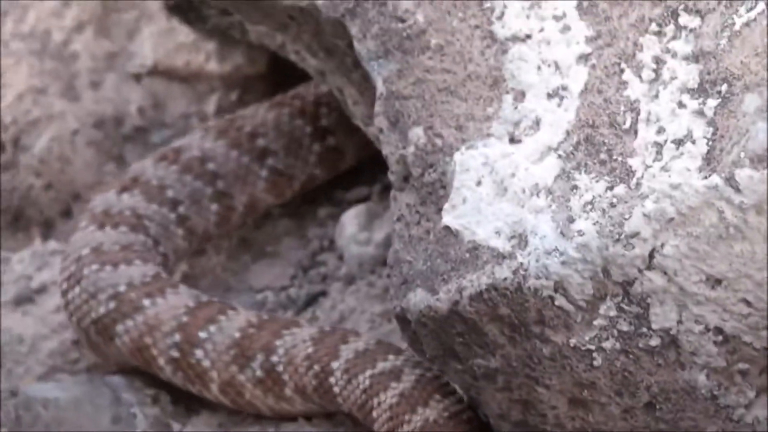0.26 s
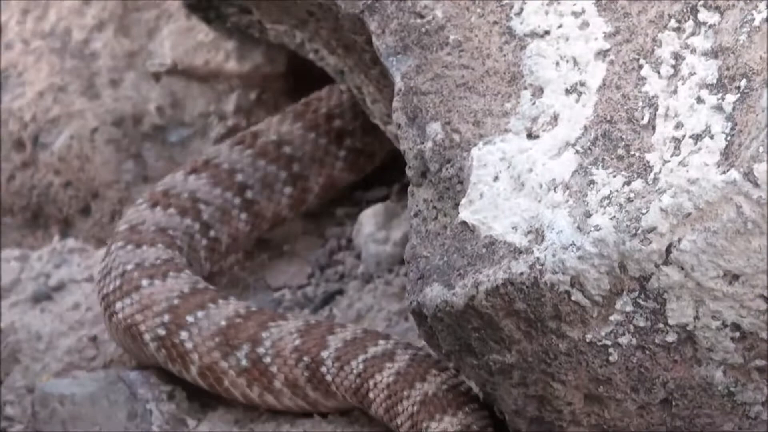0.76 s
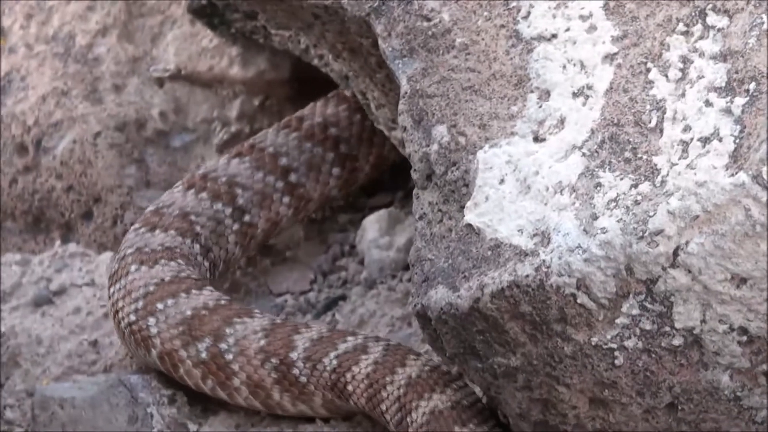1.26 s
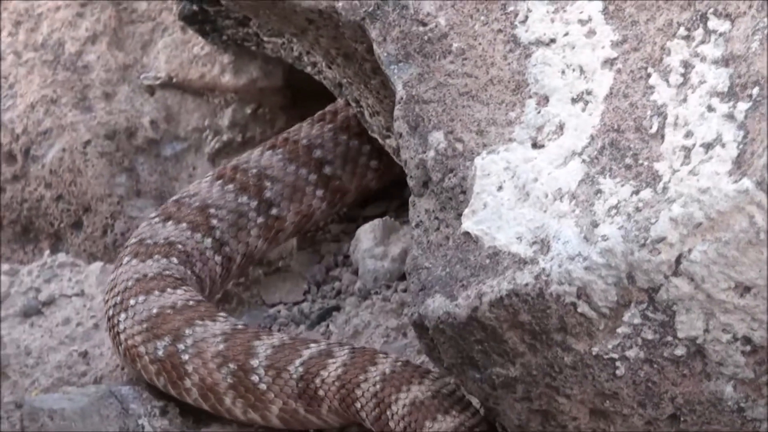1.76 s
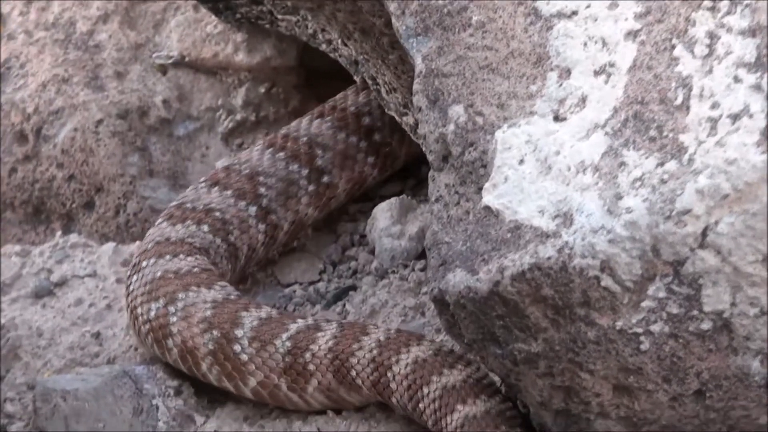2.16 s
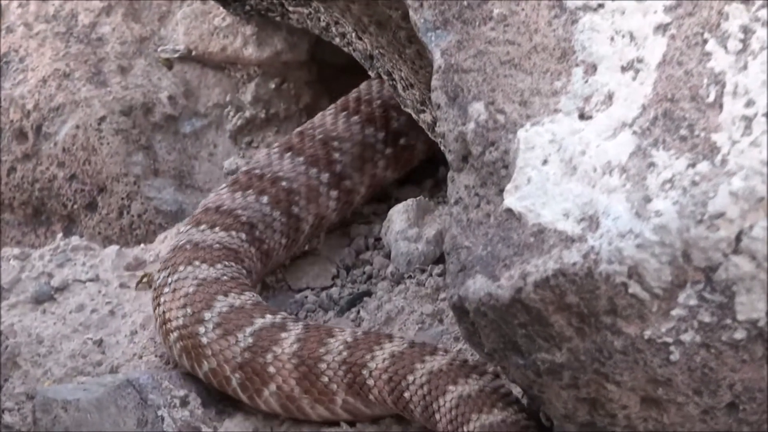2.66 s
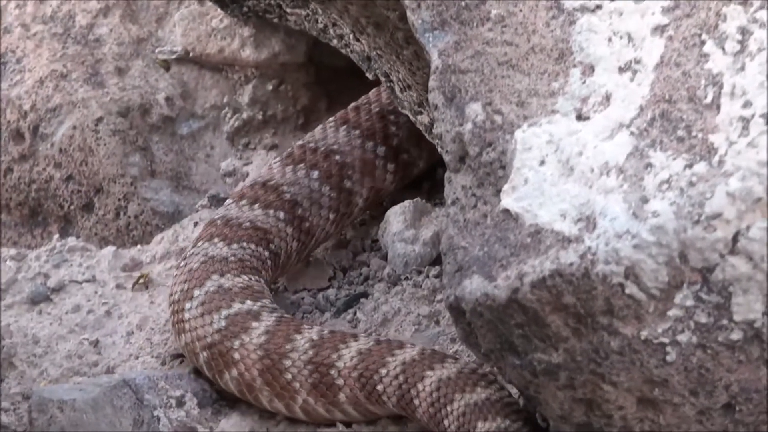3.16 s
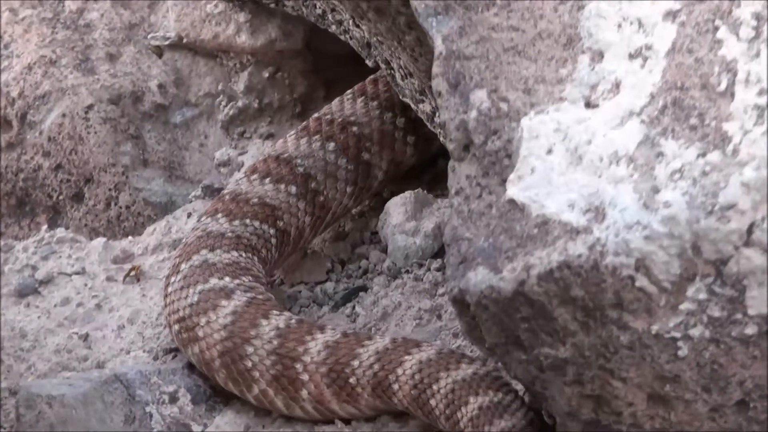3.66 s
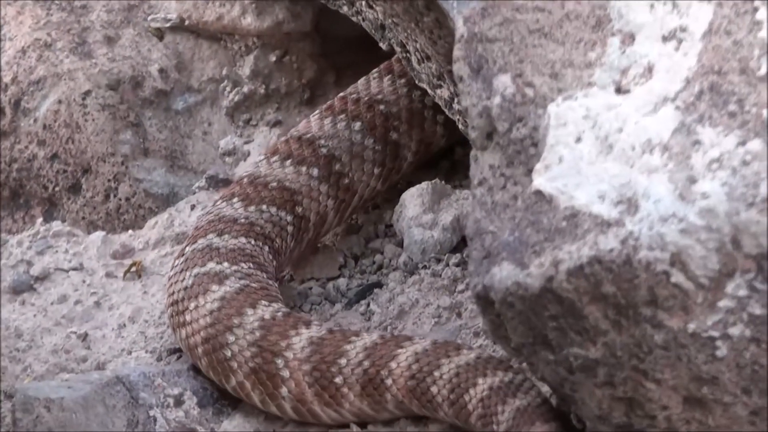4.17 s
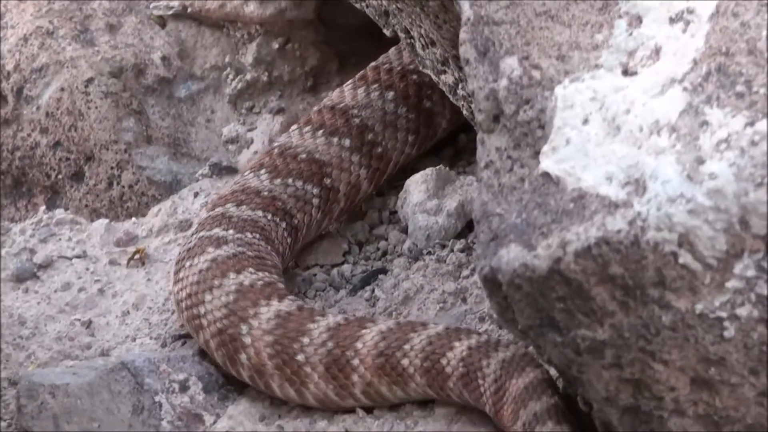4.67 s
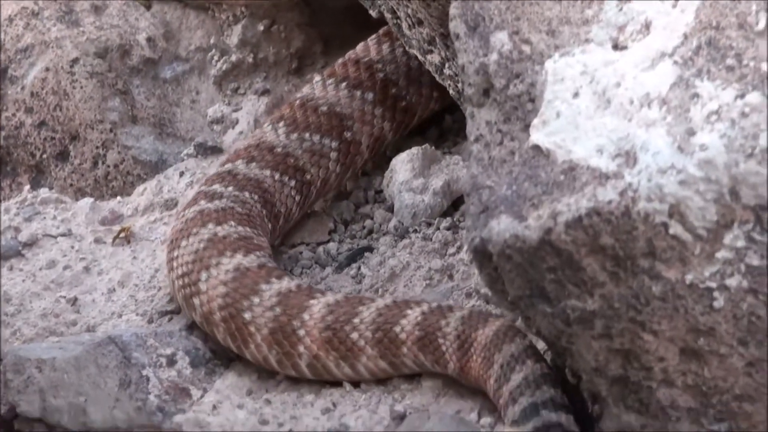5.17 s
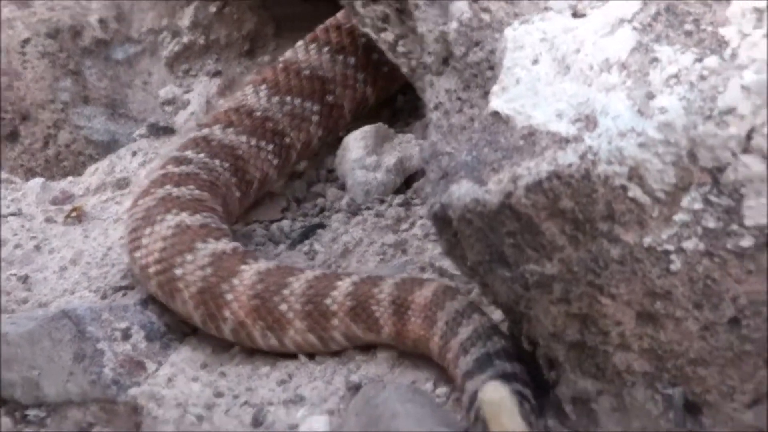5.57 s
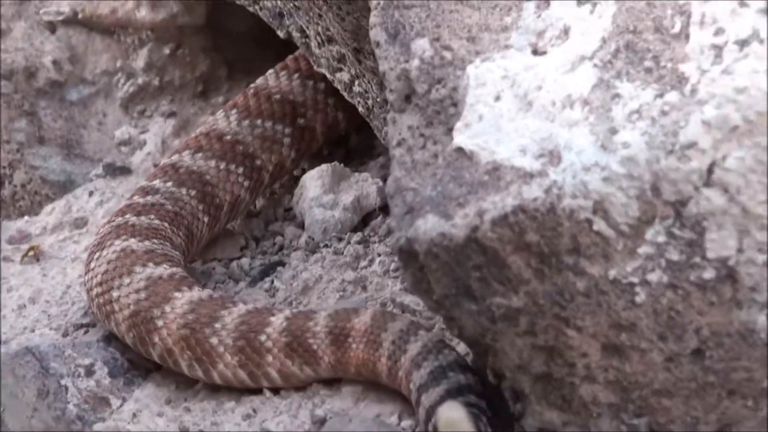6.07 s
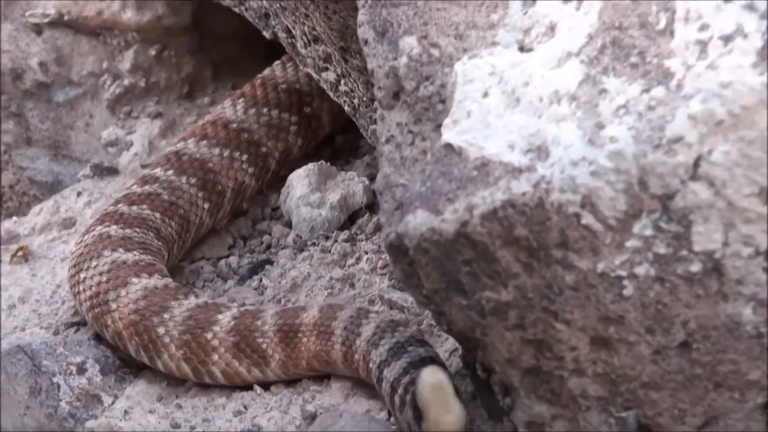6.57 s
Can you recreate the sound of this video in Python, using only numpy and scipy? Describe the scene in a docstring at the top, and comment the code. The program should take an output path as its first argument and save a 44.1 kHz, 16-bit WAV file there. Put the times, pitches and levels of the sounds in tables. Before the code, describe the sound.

Unbroken dry, hissing rattle from a snake's tail close by, over a very quiet outdoor hush and occasional dull bumps of moving air.

```python
"""Among rocks outdoors, a rattlesnake shakes its tail in a steady, rough buzz.
Excitation: hollow segments knock, most densely at each end of the swing, and ring a few shell resonances.
Propagation: as the tail slides along, delayed copies off ground and rock mostly shorten, and the notches of
their comb filter sweep up the buzz; a short diffuse haze differs left and right.
Background: air turbulence rumbles and thumps on the microphone over coloured noise, a quiet outdoor hush."""
import sys
import numpy as np
from scipy import signal
from scipy.fft import rfft, irfft
from scipy.io import wavfile
from scipy.ndimage import uniform_filter1d, map_coordinates

SR = 44100
rng = np.random.default_rng(int(sys.argv[2]) if len(sys.argv) > 2 else 0)


def voltage_ratio(level):
    """Linear amplitude factor for a level in decibels (scalar or array-like)."""
    return 10 ** (np.asarray(level, float) / 20)


def dump_mix(stems):
    """Bounce the given channels to the path in sys.argv[1] as a 16-bit WAV at rate SR."""
    frames = np.atleast_2d(stems).T  # one column per channel
    limited = np.clip(frames, -1, 1)  # hard clip at full scale
    pcm = np.round(limited * 32767).astype(np.int16)
    wavfile.write(sys.argv[1], SR, pcm)


N = 300629

# Outdoor hush, spectral density before its slow swell: f/Hz, density/dB per Hz
HUSH_SPECTRUM = [(30, -100), (100, -93), (200, -89.5), (400, -95.5), (700, -92.5), (1200, -88), (2200, -89),
                 (5000, -85.5), (15000, -108)]
# Gusts on the microphone, rumble before its spectral parts are weighted: peak t/s, level/dB, fade/(dB per s)
GUSTS = [(.5, -58, 40), (.72, -48, 60), (.83, -29, 170), (.96, -30, 400), (1.03, -34, 300),
         (1.08, -27.5, 88), (1.4, -45.5, 200), (1.65, -42, 300), (2.66, -49, 80), (2.77, -45, 250),
         (2.85, -46.5, 170), (2.98, -38, 300), (3.04, -38.5, 111), (3.12, -44.5, 170), (3.28, -49, 300),
         (3.45, -55.5, 100), (4.65, -54, 300), (4.73, -57, 300), (4.8, -55, 90), (5.07, -48.5, 190),
         (5.2, -53, 60), (5.3, -50, 60), (5.58, -38.5, 98), (5.88, -46.5, 107)]
# Single puffs: t/s, nominal peak level/dB, nominal f/Hz (glides down), left minus right/dB, length/s
PUFF_EVENTS = [(0.812, -30, 178, 2, 0.031), (0.849, -33, 168, -1, 0.035), (0.952, -25, 172, 6, 0.029),
               (1.009, -23.5, 177, -2, 0.032), (1.059, -30, 195, 6, 0.043), (1.099, -26.5, 147, 4, 0.04),
               (1.139, -32, 159, -5, 0.028), (1.629, -32.5, 109, 9, 0.019),
               (2.969, -40.5, 159, -1.0, 0.031), (3.039, -36, 174, 4, 0.022), (3.119, -43, 103, 7, 0.032),
               (5.299, -42, 115, 5, 0.028), (5.569, -46, 102, -8, 0.033), (5.599, -43, 101, -0.5, 0.028)]
# Echo paths as the tail slides along: t/s, ground delay/ms, ground strength (0-1),
# near stone delay/ms, rock face delay/ms
ECHO_PATHS = [(0.0, 0.306, 0.652, 0.451, 0.808), (0.26, 0.289, 0.41, 0.5, 0.787),
              (0.72, 0.276, 0.488, 0.48, 0.765), (0.94, 0.26, 0.452, 0.47, 0.709),
              (1.98, 0.252, 0.02, 0.448, 0.67), (2.36, 0.257, 0.408, 0.416, 0.67),
              (2.55, 0.219, 0.204, 0.384, 0.678), (2.75, 0.203, 0.484, 0.382, 0.688),
              (3.29, 0.201, 0.572, 0.381, 0.663), (3.57, 0.199, 0.564, 0.377, 0.618),
              (4.13, 0.184, 0.43, 0.353, 0.615), (4.48, 0.144, 0.458, 0.291, 0.57),
              (5.07, 0.128, 0.588, 0.263, 0.58), (5.18, 0.124, 0.58, 0.264, 0.675),
              (5.67, 0.12, 0.368, 0.334, 0.648), (5.95, 0.105, 0.348, 0.315, 0.648),
              (6.45, 0.114, 0.396, 0.298, 0.618), (6.82, 0.107, 0.58, 0.257, 0.59)]
# Tail swing, mean rate: t/s, f/Hz (full swings per second)
SWING_RATE = [(0, 77), (1.2, 75.8), (1.45, 74), (1.7, 78.4), (2.6, 79.3), (3.8, 78.8), (4.1, 76.4),
              (5.3, 77), (5.8, 75.6), (6.1, 80.8), (6.82, 81)]
# Shaking effort: t/s, buzz level/dB, turn of the large hollow base segments towards the microphone/dB
SHAKING = [(0, -25, 3), (.55, -23.5, 1), (.76, -21.5, 2), (1.14, -25, -3), (1.61, -23, -2.5),
           (2.0, -23, -3.5), (2.12, -24, 1.5), (2.33, -22.5, -1.5), (3.6, -22.5, -2.5), (4.4, -23, -4),
           (5.0, -23.5, 1), (5.7, -24, 2.5), (6.2, -22.5, 6.5), (6.82, -23, 8)]
# Shell resonances: f/Hz, nominal bandwidth/Hz, relative level/dB
SHELL_MODES = [(713, 260, -38), (1114, 253, -30.5), (1760, 480, -29.5), (3950, 670, -18.5),
               (5006, 378, -2.5), (5318, 323, -0.5), (5580, 357, -1.5), (6550, 1000, -5), (7470, 520, -4.5),
               (7973, 224, -0.5), (8428, 485, 1), (9280, 550, -10), (10140, 940, -13), (11600, 660, -11.5),
               (12420, 750, -12.5), (14100, 1000, -18), (14370, 630, -19)]

HUSH_SWELL_DB, HUSH_PEAK_S, HUSH_PERIOD_S = 1.5, 2.26, 3.66
GUST_RISE_DB_PER_S, CALM_DB = 266, -71.5
STONE_ECHO, FACE_ECHO = .22, .2  # strength 0-1
PAN_DB = 0.9  # left minus right
BASE_HZ, BASE_WIDTH_HZ, BASE_DB = 2748, 332, -14.5  # resonance of the base segments, nominal bandwidth
BASE_SHARE, BASE_UNDER_HZ = 0.19, 2000  # part of the base's turn that the lowest resonances follow
OPPOSITE = np.array([[1], [-1]])  # sign of a difference signal on left and right


def curve(table):
    """Linear interpolation of each column of a table, one value per sample."""
    s, *columns = np.transpose(table)
    return [np.interp(np.arange(N) / SR, s, c) for c in columns]


def unit(x):
    """Normalisation to an rms value of 1."""
    return x / np.sqrt(np.mean(x ** 2))


def walk(rate):
    """Stepwise noise: random levels held for 1 / rate s, smoothed by two moving averages, rms 1."""
    hold = int(SR / rate)
    steps = rng.standard_normal(N // 100)[np.arange(N) // hold]
    return unit(uniform_filter1d(uniform_filter1d(steps, hold), hold))


def flicker(lo_hz, hi_hz):
    """Band-limited fluctuation: noise between two modulation rates, without slow drift, rms 1."""
    every = 50  # samples between control points
    band = signal.butter(2, [lo_hz, hi_hz], "bandpass", fs=SR / every, output="sos")
    coarse = signal.sosfilt(band, rng.standard_normal(N // every + 2))
    return unit(np.interp(np.arange(N) / every, np.arange(len(coarse)), coarse))


def ring(x, hz, width_hz):
    """Resonance: a second-order peak of gain 1 at its centre."""
    return signal.lfilter(*signal.iirpeak(hz, hz / width_hz, SR), x)


def lowpass(x, hz, order=2):
    """Low-pass filtering with a maximally flat (Butterworth) passband."""
    return signal.sosfilt(signal.butter(order, hz, fs=SR, output="sos"), x)


def echo(x, delay_ms):
    """Variable delay: the sound is read earlier in its course, at a moving place."""
    return map_coordinates(x, [np.arange(N) - delay_ms * SR / 1000], order=3)


def air(side_db):
    """Coloured noise: a quiet hush with a slow swell, nearly the same left and right."""
    hz = np.fft.rfftfreq(N, 1 / SR) + 1  # + 1 keeps the logarithm finite
    table_hz, table_db = np.transpose(HUSH_SPECTRUM)
    density_db = np.interp(np.log(hz), np.log(table_hz), table_db)
    colour = voltage_ratio(density_db) * np.sqrt(SR / 2)
    mid, side = irfft(rfft(rng.standard_normal((2, N))) * colour, N)
    t = np.arange(N) / SR
    swell_db = HUSH_SWELL_DB * np.cos(2 * np.pi * (t - HUSH_PEAK_S) / HUSH_PERIOD_S)
    flicker_db = 1.3 * walk(20)
    return voltage_ratio(swell_db + flicker_db) * (mid + voltage_ratio(side_db) * side * OPPOSITE)


def gusts():
    """Power summation: each gust rises fast and fades at its own pace above the calm level."""
    t = np.arange(0, N, 32) / SR
    s, db, fade = np.transpose(GUSTS)[:, :, None]
    below_peak_db = np.where(t < s, GUST_RISE_DB_PER_S * (s - t), fade * (t - s))
    power = voltage_ratio(2 * CALM_DB) + np.sum(voltage_ratio(2 * (db - below_peak_db)), axis=0)
    return np.interp(np.arange(N) / SR, t, 10 * np.log10(power))


def wind(side_db, gusty_db, deep_db, bright_db):
    """Turbulence on the microphone ports: noise bands whose upper, less coherent part grows with strength."""
    gust_db = gusts()
    noise = rng.standard_normal((3, N))
    deep = unit(lowpass(ring(noise[0], 37, 110), 115, order=3))
    mid, side = (unit(lowpass(ring(v, 107, 140), 350, order=3)) for v in noise[1:])
    # the upper part grows faster than the level; bright_db holds at the strongest gust
    share = voltage_ratio(bright_db + 0.53 * (gust_db - gust_db.max()))
    upper = mid + voltage_ratio(side_db + gusty_db * walk(35)) * side * OPPOSITE
    lumpy_db = gust_db + gusty_db * walk(35)
    return voltage_ratio(lumpy_db) * (voltage_ratio(deep_db) * deep + share * upper)


def puffs():
    """Pressure pulses: each puff pushes the membrane for a few cycles of falling frequency."""
    out = np.zeros((2, N))
    for (s, db, hz, pan_db, length), turn in zip(PUFF_EVENTS, rng.random(len(PUFF_EVENTS))):
        t = np.arange(int(length * SR)) / SR
        shape = np.sin(np.pi * (t / length) ** 0.35) ** 2  # quick rise, slow fall
        cycles = hz * t * (1.2 - 0.37 * t / length) + turn
        push = shape * np.sin(2 * np.pi * cycles)
        at = int(s * SR)
        out[:, at:at + len(t)] += push * voltage_ratio(db + pan_db * OPPOSITE / 2)
    return out


def rocks(tail, spread_db, rough_hz):
    """Interference and scattering: close echoes comb the buzz, scattered stones add a short stereo haze."""
    # rough stone scatters the treble, so the echoes are dull; the filter adds no delay
    dull = signal.filtfilt(*signal.butter(2, rough_hz, fs=SR), tail)
    ground_ms, ground, stone_ms, face_ms = curve(ECHO_PATHS)
    near = tail + ground * echo(dull, ground_ms)
    near = near + STONE_ECHO * echo(dull, stone_ms) + FACE_ECHO * echo(dull, face_ms)

    t = np.arange(int(.04 * SR)) / SR
    scatter = rng.standard_normal(len(t)) * np.exp(-t / 0.0026)
    treble = lowpass(ring(near, 11400, 6400), 10600, order=6)
    haze = unit(signal.fftconvolve(treble, scatter)[:N])
    heard = unit(near) + voltage_ratio(spread_db) * haze * OPPOSITE

    # loudness follows the effort alone, whatever the echoes add
    slow_power = uniform_filter1d(heard[0] ** 2 + heard[1] ** 2, int(.2 * SR)) / 2
    effort_db = curve(SHAKING)[0]
    return heard / np.sqrt(slow_power) * voltage_ratio(effort_db + PAN_DB * OPPOSITE / 2)


def rattle(knocks_per_s, bunching, lopsided_db, scatter_db, shared, flutter_db, waver_db):
    """Impact excitation: random knocks, denser at both swing ends, ring shell resonances in varying mixes."""
    swing, = curve(SWING_RATE)
    phase = 2 * np.pi * np.cumsum(swing * (1 + .006 * walk(30))) / SR
    # two bunches per swing; dividing by i0 keeps the mean knock rate
    density = knocks_per_s / SR * np.exp(bunching * np.cos(2 * phase)) / np.i0(bunching)
    hit = rng.random(N) < density

    # one side of the swing strikes harder, and the grip of the muscles flutters
    grip_db = flutter_db * flicker(12, 60)
    force = hit * voltage_ratio(scatter_db * rng.standard_normal(N) + lopsided_db * np.cos(phase) + grip_db)

    turn_db = curve(SHAKING)[1]
    modes = [(hz, w, db + BASE_SHARE * turn_db * (hz < BASE_UNDER_HZ)) for hz, w, db in SHELL_MODES]
    modes.append((BASE_HZ, BASE_WIDTH_HZ, BASE_DB + turn_db))
    common, shared = rng.standard_normal(N), np.clip(shared, 0, 1)
    out = 0
    for hz, width_hz, db in modes:
        mix = np.sqrt(shared) * common + np.sqrt(1 - shared) * rng.standard_normal(N)
        wavering_db = waver_db * flicker(12, 35)
        # two resonators in cascade, each wider than the nominal bandwidth
        once = ring(force * mix, hz, 1.46 * width_hz)
        out = out + voltage_ratio(db + wavering_db) * ring(once, hz, 1.68 * width_hz)
    return out


def scene():
    """Superposition of the rattle between the rocks, the moving air on the microphone and the hush."""
    hush = air(side_db=-18)
    air_on_ports = wind(side_db=-2, gusty_db=3, deep_db=-4.5, bright_db=-3) + puffs()
    tail = rattle(knocks_per_s=11000, bunching=.45, lopsided_db=0.6, scatter_db=2.5, shared=0.19,
                  flutter_db=0.82, waver_db=0.98)
    return rocks(tail, spread_db=-16, rough_hz=11500) + air_on_ports + hush


def low_pass(x):
    """Removes everything above the highest recorded frequency."""
    return signal.sosfilt(signal.butter(12, 16180, fs=SR, output="sos"), x)


def record(dry):
    """Soft saturation: a small microphone rounds the highest peaks."""
    rounded = np.tanh(2.292 * dry) / 2.155
    return low_pass(rounded)


dry = scene()
out = record(dry)
dump_mix(out)
```